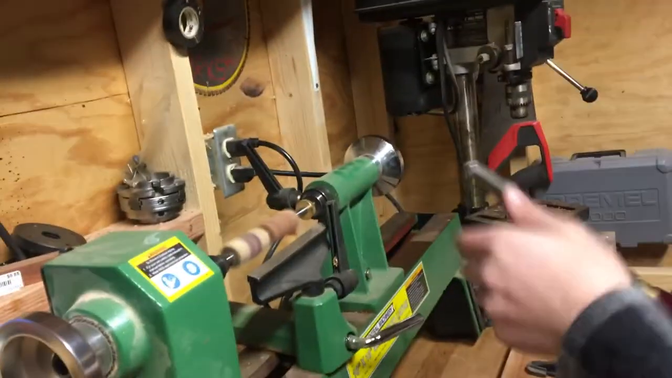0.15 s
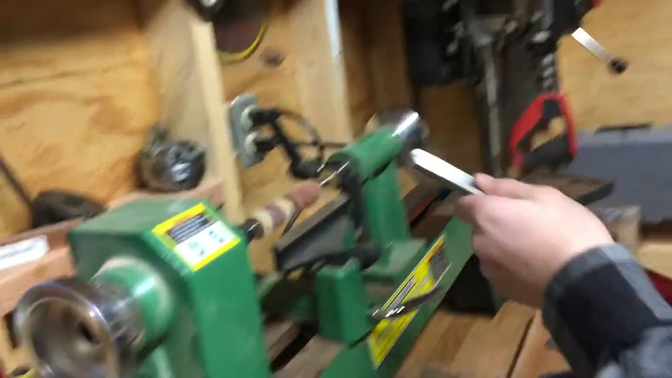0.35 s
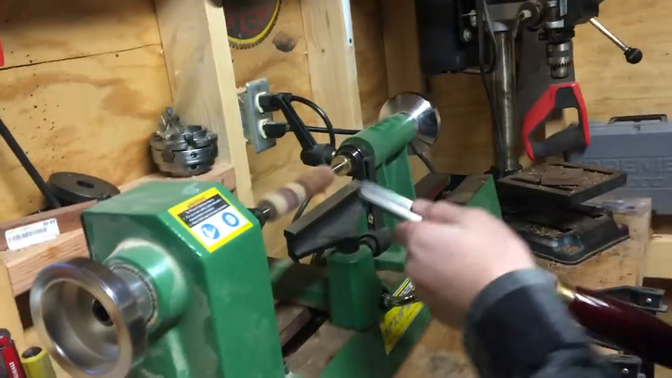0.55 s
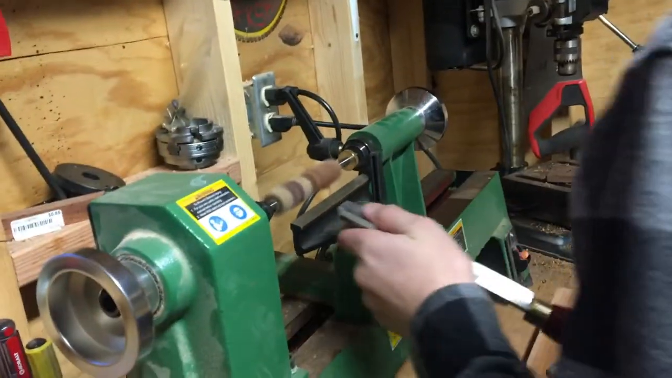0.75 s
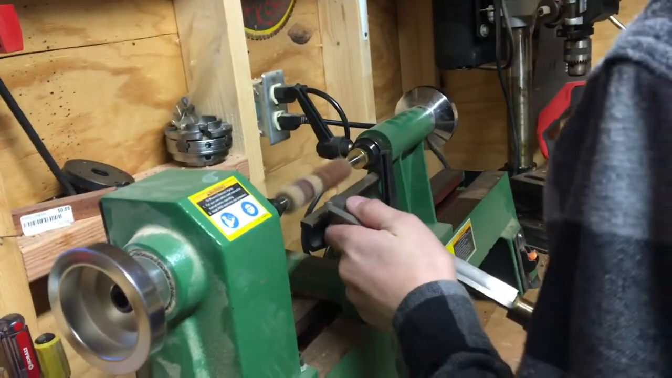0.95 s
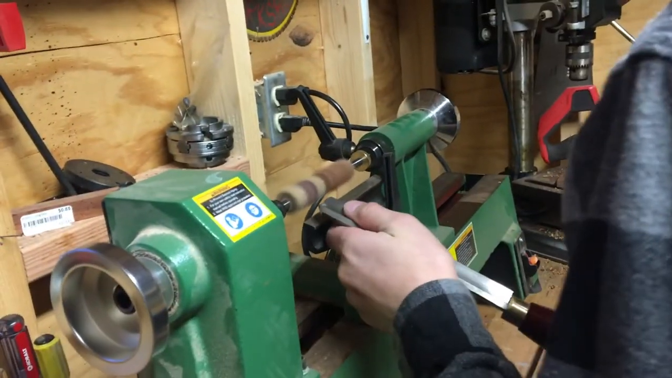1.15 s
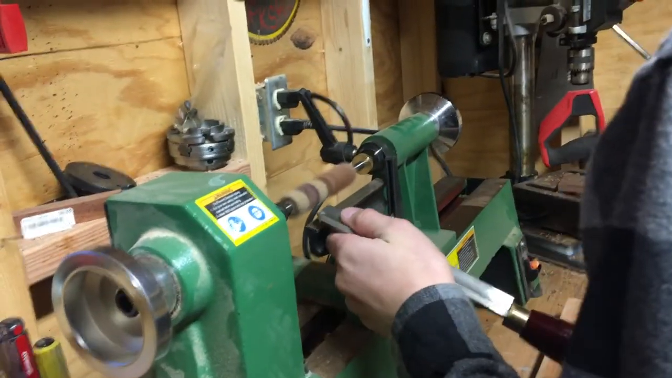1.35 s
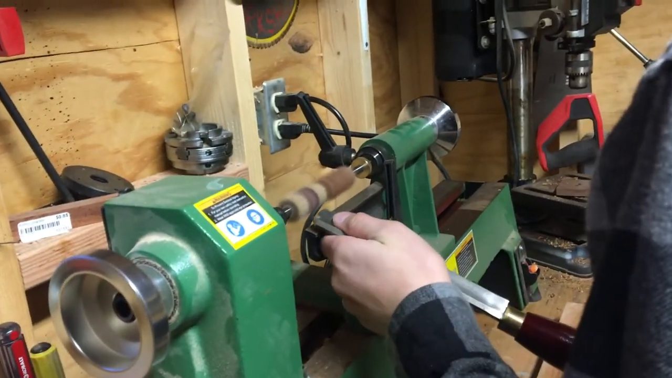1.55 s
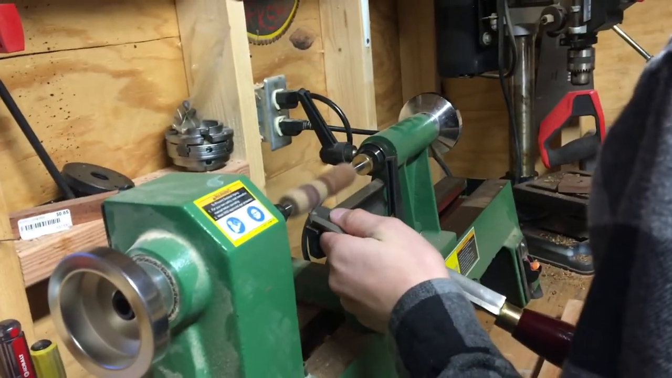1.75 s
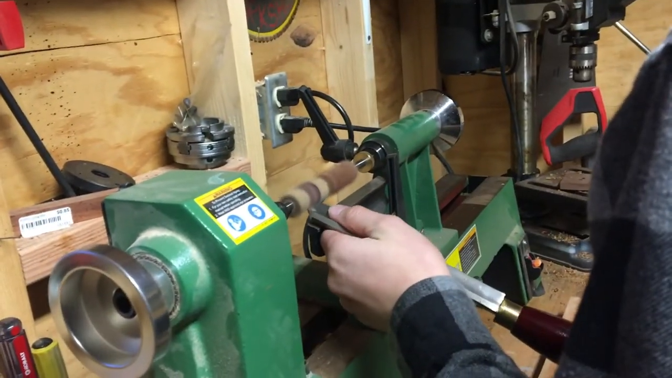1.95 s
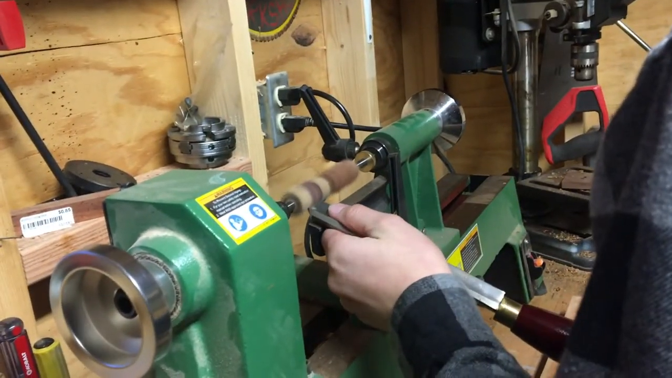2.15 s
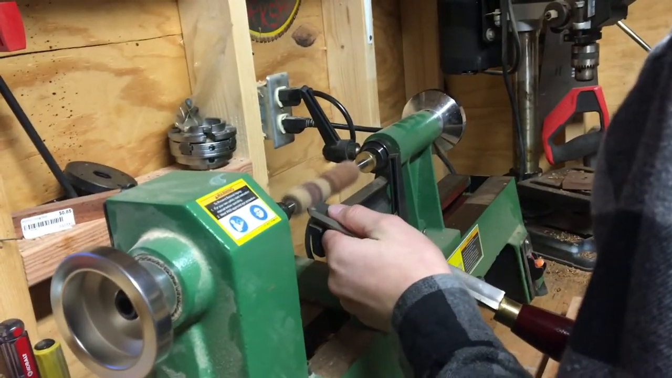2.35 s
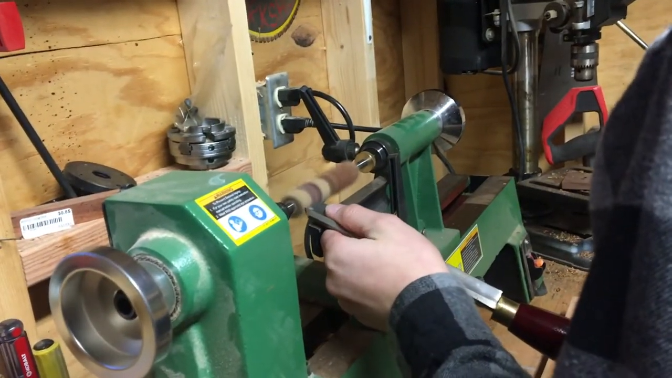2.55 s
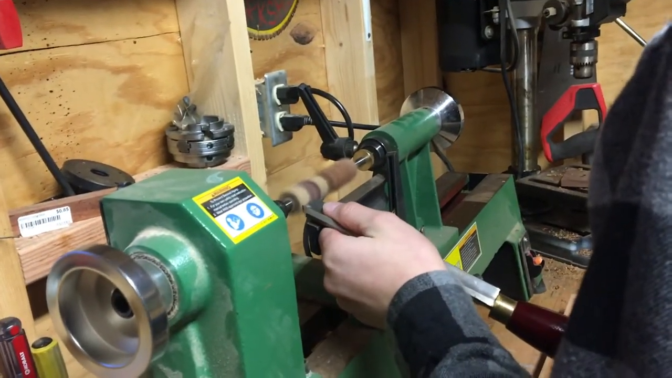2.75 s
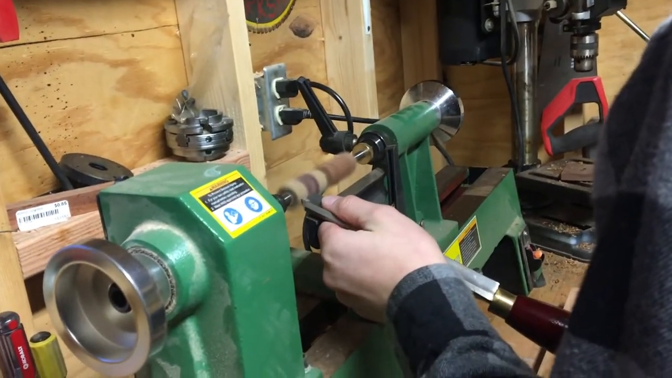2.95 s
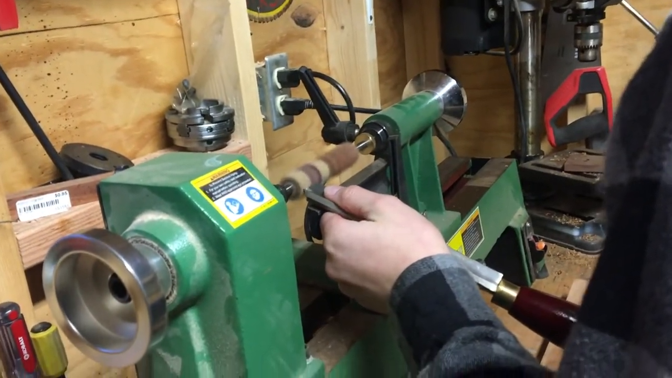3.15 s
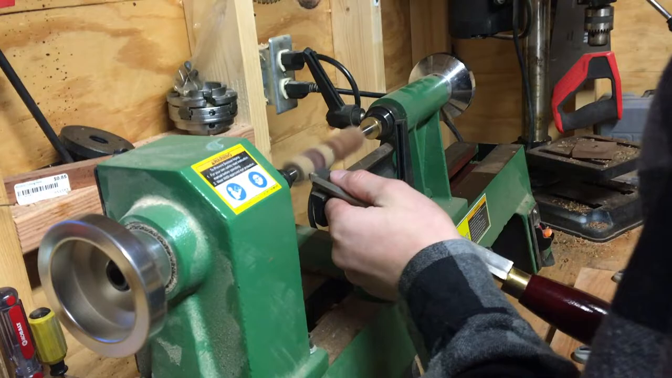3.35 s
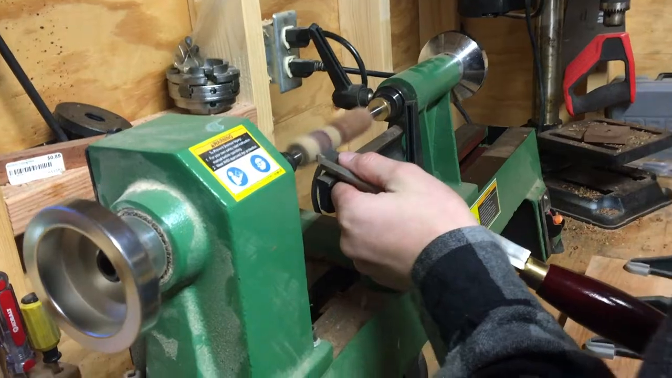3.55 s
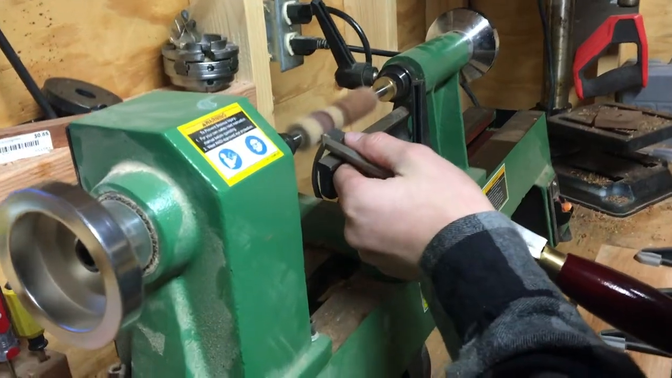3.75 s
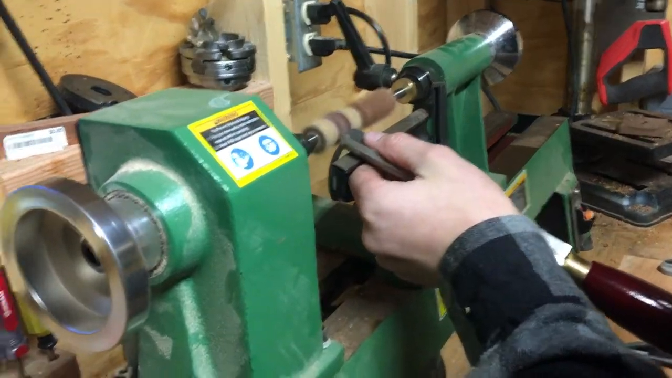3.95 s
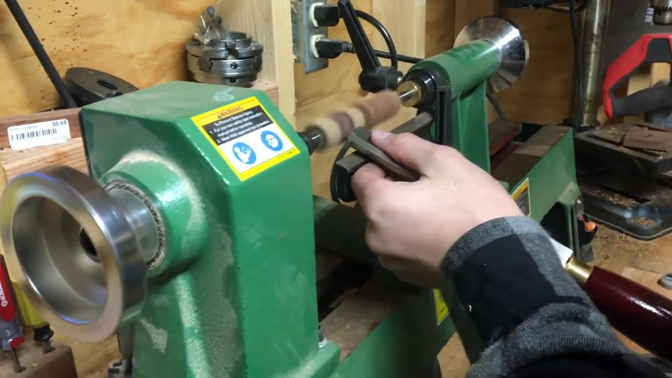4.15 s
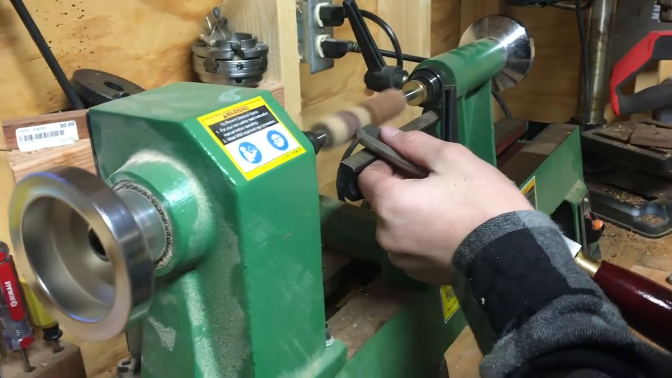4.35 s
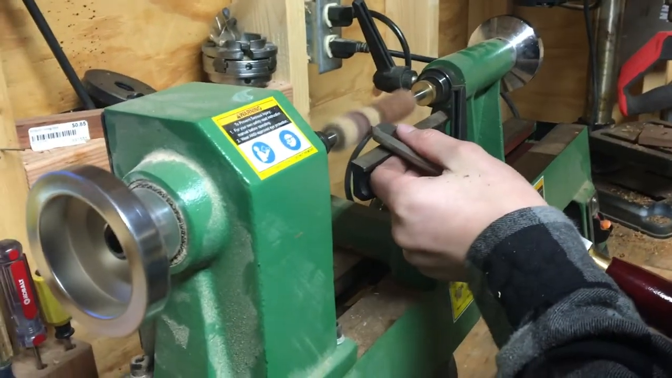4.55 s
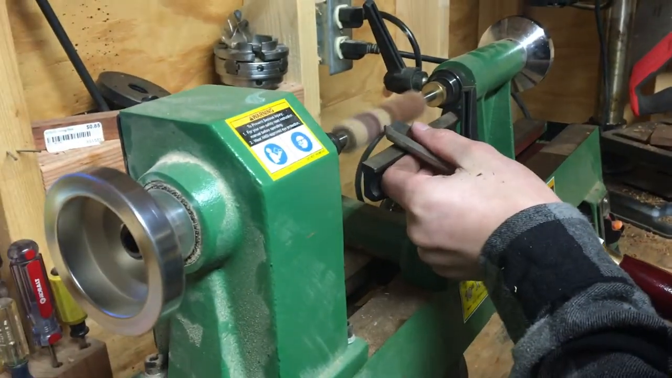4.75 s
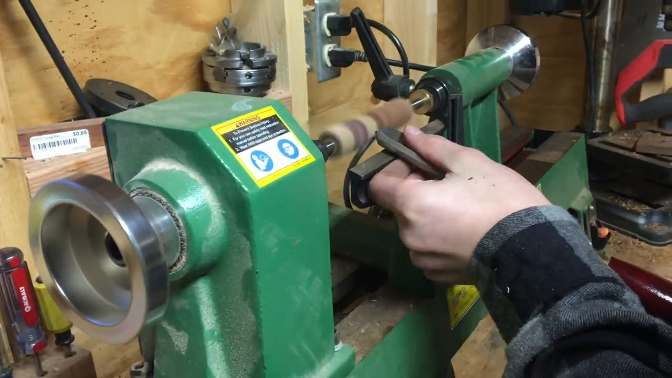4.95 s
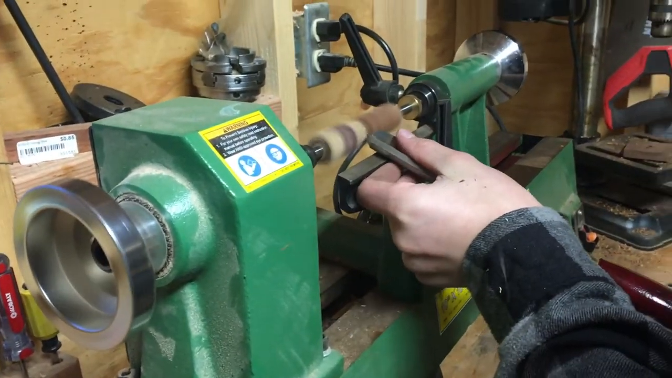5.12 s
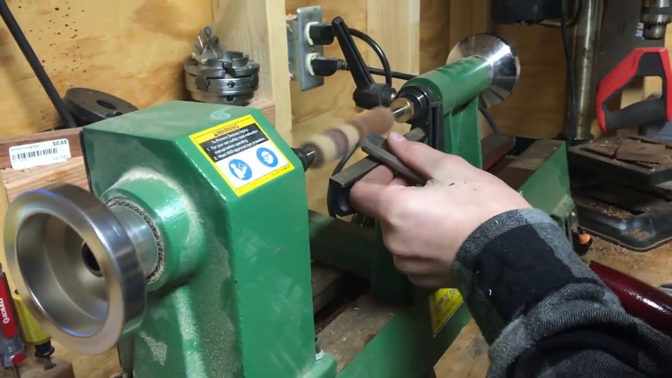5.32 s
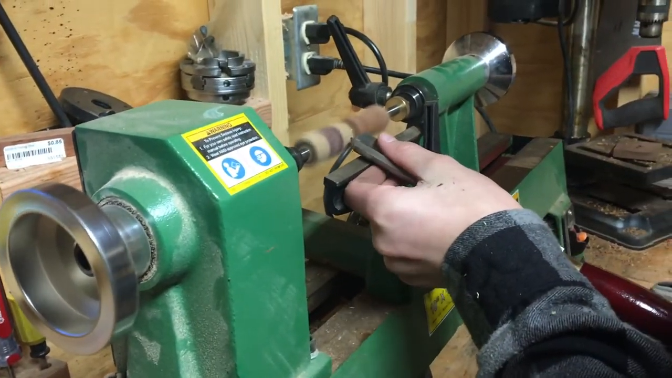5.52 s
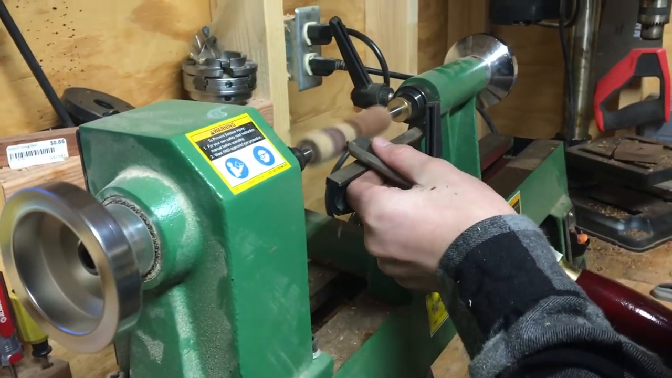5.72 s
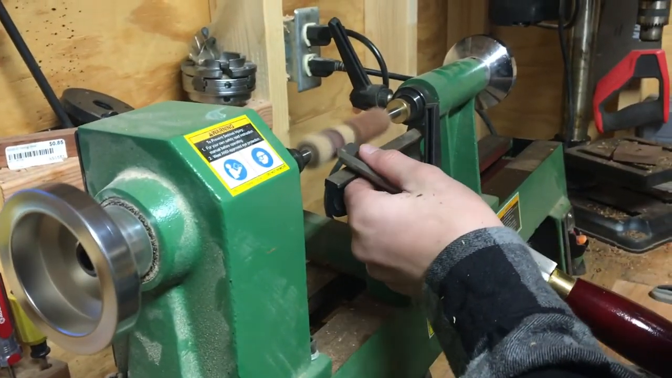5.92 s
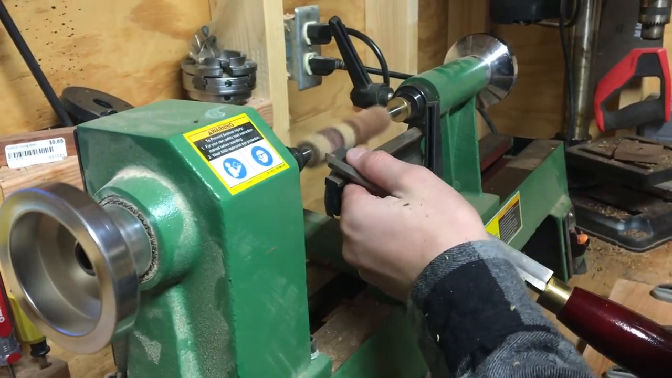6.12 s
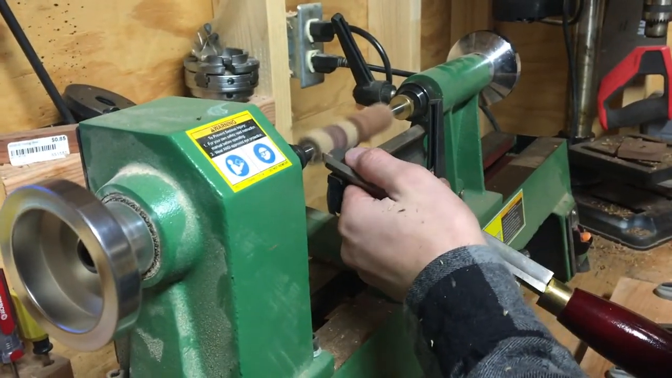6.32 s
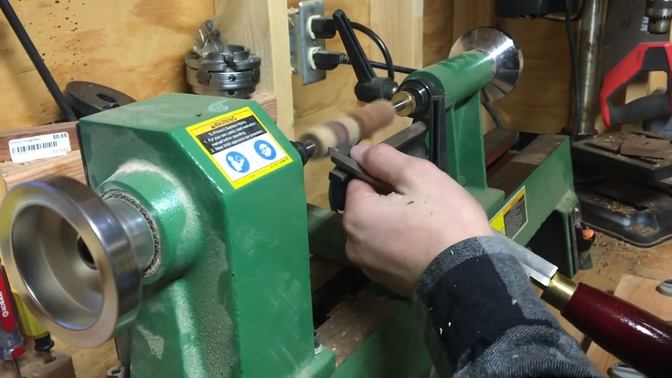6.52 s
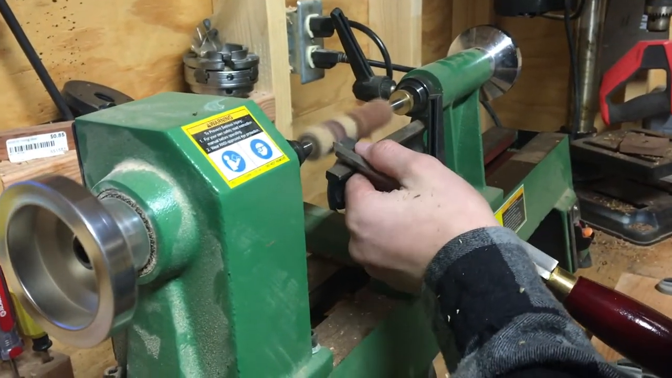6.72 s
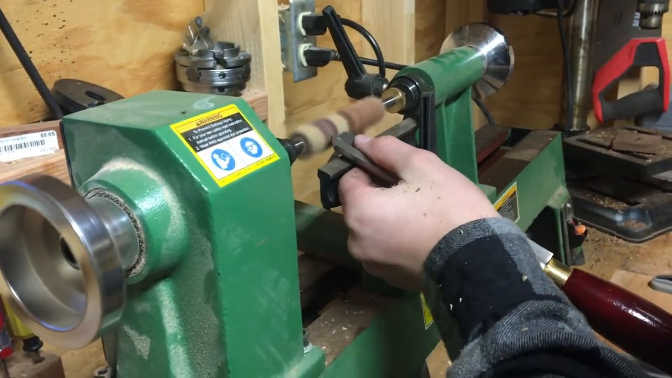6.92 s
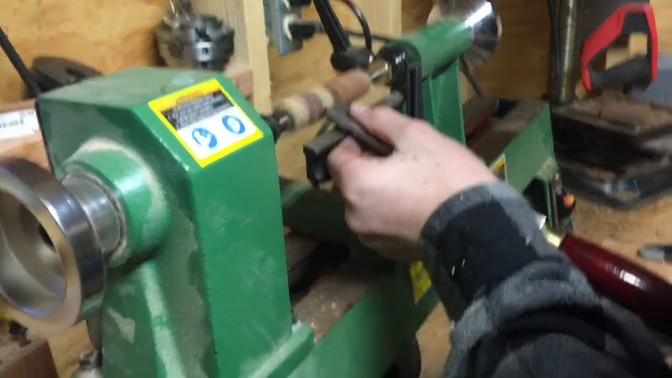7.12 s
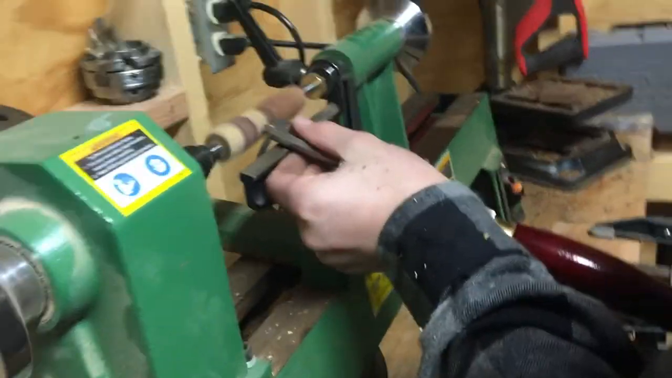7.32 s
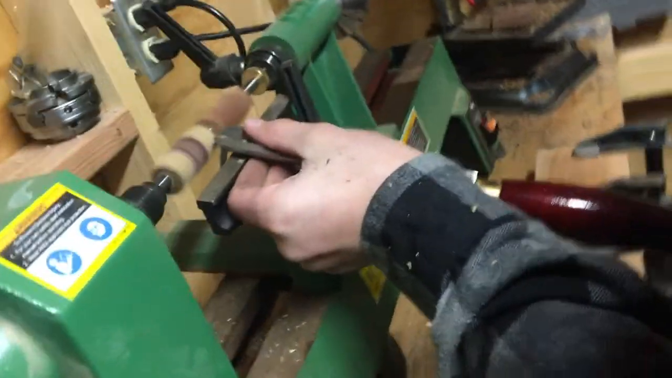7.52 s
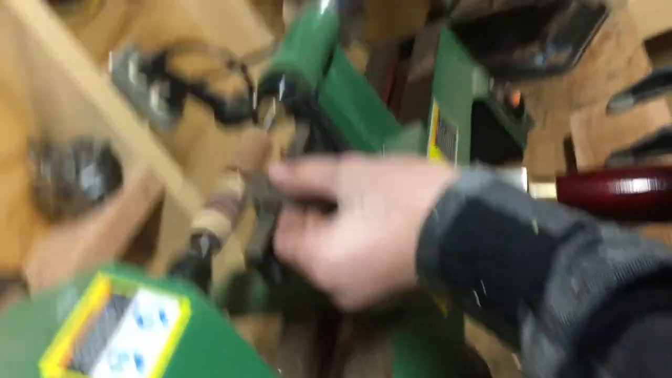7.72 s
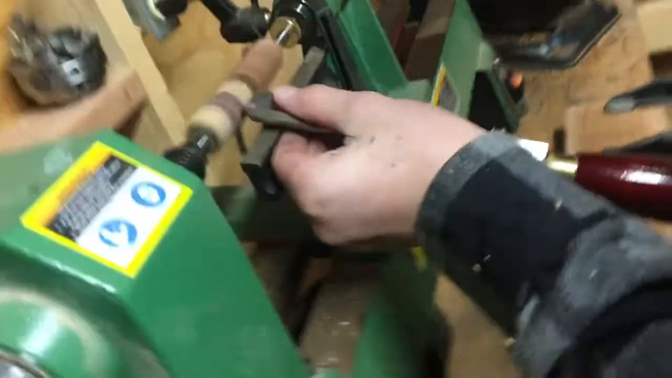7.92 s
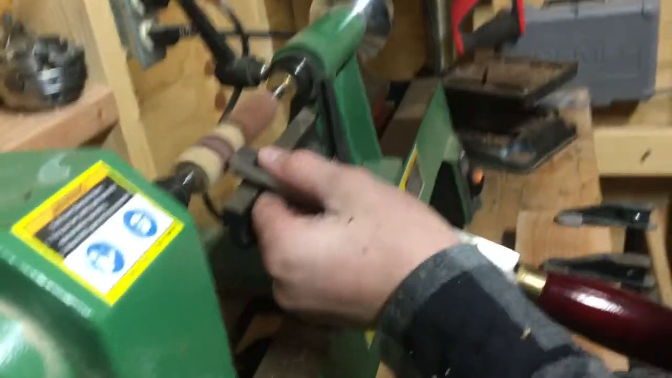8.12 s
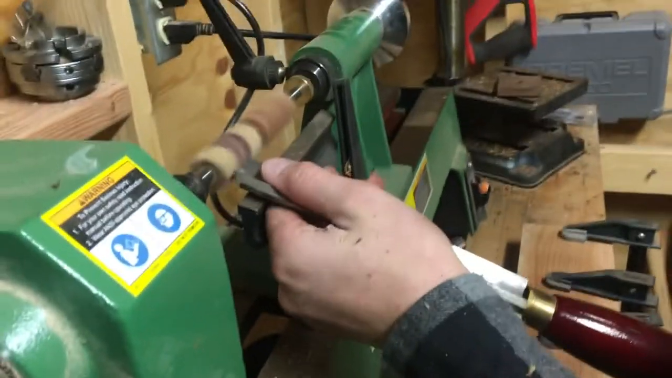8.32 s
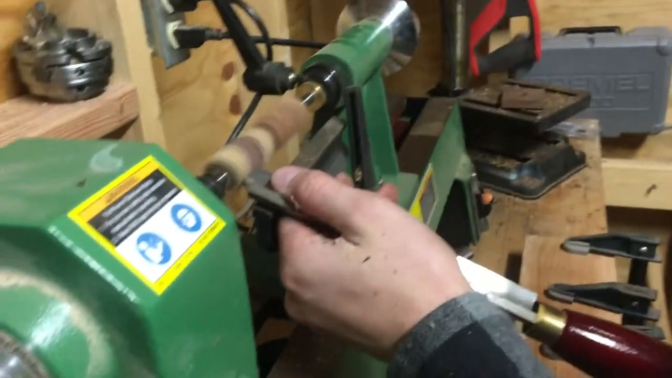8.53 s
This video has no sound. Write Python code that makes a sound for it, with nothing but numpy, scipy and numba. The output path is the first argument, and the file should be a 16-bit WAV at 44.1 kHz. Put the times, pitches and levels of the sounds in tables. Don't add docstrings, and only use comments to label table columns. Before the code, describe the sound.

A lathe motor hums evenly with dull thumps through the bench and one faint cloth brush. Crisp woody clicks follow as a tool touches spinning wood. Abruptly the whole sound jumps an octave higher and twice as fast, and a harsh, rapidly pulsing scrape takes over, hollow wood tone beneath, metallic hiss above, pressing and lifting unevenly. The close microphone slightly rounds loud peaks; the timber room adds only a short dull tail.

```python
import sys
import numpy as np
from scipy import signal
from scipy.fft import rfft, irfft
from scipy.io import wavfile
from scipy.ndimage import uniform_filter1d
from numba import njit

SR = 44100
rng = np.random.default_rng(int(sys.argv[2]) if len(sys.argv) > 2 else 0)


def waveform_to_disk(signal):
    frames = np.transpose(np.atleast_2d(signal))
    scaled = np.clip(frames, -1, 1) * 32767
    samples = np.round(scaled).astype(np.int16)
    wavfile.write(sys.argv[1], SR, samples)


def ratio(d):
    e = np.asarray(d, float) / 20
    return 10 ** e


N = 382788

FAST_S = 3.279
SPINDLE_HZ, MAINS_HZ, BELT_HZ = 28.135, 119.92, 151.02
CORNER_GAP_TURNS = .245

# multiple of the base rate, rms level in dB.
MAINS_LINES = [(1, -40), (2, -49.5)]
BELT_LINES = [(2, -69), (3, -60), (4, -63.5), (5, -53.5), (6, -51), (7, -63), (8, -59.5), (9, -60.5)]
SPINDLE_LINES = [(1, -61.5), (11, -68.5), (22, -66), (36, -79), (49, -60), (117, -62.5)]
# frequency in Hz, rms level in dB.
WHINES = [(205, -68), (270, -67), (352, -66), (410, -69), (713, -68), (738, -64), (812, -66), (880, -67),
          (1001, -65), (1039, -67), (1074, -63), (1096, -66), (1241, -66), (1123.9, -61), (1168.7, -65),
          (1264.1, -61), (1559.6, -73), (1661.2, -69), (1678.1, -62), (1829.1, -69), (1946.5, -70),
          (2030.9, -71), (2131.2, -70), (2248.5, -70), (2282.2, -71), (2360, -69), (2399.6, -71),
          (2468.2, -71), (2584, -71), (2632.8, -69), (4005.4, -78)]
# frequency in Hz, density in dB per Hz.
RUMBLE_SPECTRUM = [(18, -26), (30, -47), (64, -7.5), (88, -9.5), (124, 0), (149, -10.5), (179, -14),
                   (233, -8.5), (287, -20), (499, -15.5), (913, -14), (1460, -17.5), (3400, -24),
                   (4780, -34.5), (6000, -38), (6900, -38.5), (7900, -42.5), (9600, -38.5), (10400, -42.5),
                   (11700, -39), (13500, -43), (16000, -51)]
RUMBLE_DB = -46
# frequency in Hz, width in Hz, level in dB.
HOUSING_MODES = [(1100, 130, 6), (3340, 80, 6), (2130, 650, -4), (3550, 62, 5), (6200, 180, -37),
                 (3980, 20, 13)]
# start in seconds, peak in dB, frequency in Hz, length in seconds.
BENCH_KNOCKS = [(0.0, -41, 65, .08), (.515, -44, 310, .06), (.53, -33, 66, .12), (.56, -48, 340, .05),
                (.66, -47, 66, .12), (3.95, -47, 65, .08), (6.2, -48, 100, .1), (6.22, -46, 75, .14),
                (8.385, -38, 105, .06), (8.393, -38, 180, .05), (8.398, -38, 115, .05),
                (8.4, -39, 370, .03), (8.40, -37, 72, .08), (8.63, -47, 65, .1)]
# centre in seconds, level in dB, spread in seconds.
SLEEVE_BRUSH = (0.634, -61.5, 0.027)

# time in seconds, peak in dB.
FIRST_NICKS = [(2.6828, -36), (2.7187, -18.5), (2.7533, -20.5), (2.9672, -37), (3.0031, -22.5),
               (3.0739, -32), (3.1093, -34.5), (3.144, -30), (3.1813, -36), (3.2161, -22), (3.2513, -26.5),
               (3.2837, -24.5)]
FAST_NICKS = [(3.3897, -26), (3.4074, -18.5), (3.4425, -25), (3.5315, -21), (3.549, -17), (3.5854, -18),
              (3.6557, -30), (3.675, -26.5), (3.7095, -35), (3.727, -19), (3.7624, -33), (3.7804, -23.5),
              (3.7983, -40), (3.8512, -48), (3.8698, -22), (3.8874, -24)]
# frequency in Hz, density in dB per Hz.
NICK_SPECTRUM = [(180, -38), (300, -5), (930, -3.5), (2100, -8.5), (3290, -12), (5610, -15.5), (6300, -11),
                 (7690, -22.5), (11500, -22.5), (16000, -35)]
# frequency in Hz, width in Hz, level in dB.
GOUGE_MODES = [(2630, 6, -2), (3210, 49, -2), (3590, 440, -5), (5200, 95, -15), (6100, 46, -22),
               (8650, 130, 1), (11200, 96, -4)]

# time in seconds, pressure in dB, edge shear in dB,
# coupling to the headstock in dB.
FEED_PATH = [(3.28, -41.5, -6, -12), (3.7, -39.5, 2.5, -7), (4.0, -42, 0.5, -4.5), (4.45, -42.5, 4, 0.5),
             (4.7, -36.5, -2, -10.5), (5.0, -32, -11.5, -18), (5.45, -34.5, -8.5, 0), (5.8, -39, 0.5, -4.5),
             (5.95, -39.5, 2, -6), (6.19, -38, 3, -12), (6.27, -39, -2, -33), (6.9, -43, 5.5, -37),
             (7.25, -36.5, -4.5, -10), (7.75, -36.5, -8, -9), (8.05, -41.5, 3.5, -12),
             (8.15, -46.5, 10.5, -1), (8.45, -38, 10, -14), (8.68, -40.5, 7, -28)]
# time in seconds, hold in seconds, force in dB, extra tear in dB.
HAND_DIGS = [(3.4, 0.077, -2, 7.5), (3.52, 0.071, 1.5, 5), (3.77, 0.033, 1.5, 2), (3.86, 0.041, 5.5, 0.5),
             (3.99, 0.063, 3.5, 0), (4.11, 0.054, 2, 6.5), (4.35, 0.066, 1.5, -2), (4.5, 0.046, 7, -2.5),
             (4.92, 0.084, -0.5, 3.5), (5.07, 0.045, 4, 5), (5.16, .19, 2, 4.5), (5.413, 0.019, 10.5, 1.5),
             (5.63, 0.033, -2, 5), (5.855, 0.0081, 1.5, 4), (5.93, 0.026, 2.5, 1), (6.09, 0.1, 2.5, 0),
             (6.33, 0.019, 2.5, 3.5), (6.5, 0.012, 6.5, -3.5), (6.68, 0.05, 4.5, -4),
             (7.13, 0.027, -3, 5.5), (7.79, 0.072, 4, 5), (8.2, 0.028, -1.5, 0), (8.345, 0.042, 6.5, -3.5),
             (8.615, 0.0084, 5.5, -6)]
DIG_RISE_S, DIG_FALL_S = 0.026, 0.062
# deepest moment in seconds, depth in dB, easing in seconds, return in seconds.
HAND_LIFTS = [(3.35, 22, 0.13, 0.076), (3.49, 6, 0.035, 0.05), (3.632, 7, 0.05, .05),
              (3.96, 1, 0.036, 0.032), (4.47, 1.5, 0.043, 0.026), (4.63, 8.5, 0.016, 0.022),
              (5.04, 7, 0.052, 0.068), (5.28, 22, 0.21, 0.35), (5.6, 7, 0.045, 0.051),
              (5.79, 4, 0.083, 0.01), (6.29, 7, 0.019, 0.025), (6.45, 8.5, 0.13, 0.05),
              (6.63, 1, 0.034, 0.027), (6.999, 8.5, 0.049, 0.016), (7.09, 1.5, 0.027, .03),
              (7.22, 5, 0.033, 0.11), (7.6, 8.5, .1, 0.057), (7.99, 1.5, 0.039, 0.087),
              (8.31, 9, 0.02, 0.024)]
# offset in dB, share of pressure, share of digs, share of lifts.
BLANK_FOLLOWS = (-41.5, -0.05, 0.38, 0.86)
HEAD_FOLLOWS = (-34, 2.7, 1.13, 1.5)
TEAR_FOLLOWS = (-37.5, 1.37, 1.29, 1.17)
BED_FOLLOWS = (-52, 0, 0.55, 1)
MEAN_PRESSURE_DB = -38
# time in seconds, level in dB, spread in seconds.
BED_JOLTS = [(3.28, -65, 0.03), (3.87, -67, 0.28), (4.85, -59.5, 0.13), (7.37, -47.5, 0.038),
             (7.87, -53, 0.13), (8.41, -56, 0.045), (8.68, -50, 0.057)]
BED_GROWTH_DB_S, BED_SECOND_DB = 1, -17
RUN_OUT_S, RUN_OUT_DB_S = 8.44, -67

# time in seconds, angle of the first corner in turns,
# second corner minus first in dB, length of a bite in turns.
CORNER_PATH = [(3.28, 1, -34, 0.08), (3.88, 1.05, -29, 0.25), (3.931, .81, -1, 0.18),
               (5.202, .80, 2.5, 0.13), (5.6, 0.83, 2, 0.26), (6.146, 0.73, -2.5, 0.2),
               (6.223, 0.99, -1.5, 0.24), (6.999, .90, 2.5, 0.17), (7.501, 0.89, -3, 0.29),
               (8.202, 0.83, 5.5, 0.086), (8.68, 0.94, -7, 0.086)]
CRACK_TURNS, CRACK_DB = 0.067, -11
# time in seconds, heard pitch in Hz, level in dB.
BLANK_RING = [(3.28, 804, -1.5), (3.9, 830, -1.5), (4.1, 755, -2), (4.35, 794, 0), (4.55, 830, 2),
              (5.2, 832, 3), (5.45, 830, 6), (5.75, 849, 1.5), (5.92, 785, -2), (6.2, 764, 1.5),
              (6.5, 785, -1), (7.1, 778, 2), (7.28, 818, 1), (7.6, 825, 2.5), (7.92, 804, 4.5),
              (8.1, 774, -1), (8.3, 747, 0), (8.68, 750, 7)]
SIDE_MODE_S, SIDE_MODE_SPAN_S = 6.05, 0.55
HEADSTOCK_HZ = 450.
STRIKE_DB, STRIKE_LAG_TURNS, STRIKE_TURNS, STRIKE_HZ = -2, .08, .004, 900.
GRIP_TIMES = [3.28, 3.9, 4.46, 5.18, 5.4, 5.85, 6.24, 7.2, 8.1, 8.33, 8.68]
REGRIP_S = 0.13
# heard frequency in Hz, level in dB.
SHAFT_RINGS = [
    [(1575, 7), (1856, 5), (3250, 11), (3712, 11), (4725, -6), (5203, 1)],
    [(1518, 4), (1828, 3), (3375, 8), (3712, 9), (4584, 1), (5259, -7)],
    [(1603, -15.5), (1856, -8), (3318, 3), (3712, -2), (4556, 1), (5034, 3)],
    [(1518, -12), (1828, -2), (2165, 8), (3712, -4), (4430, 6), (5850, 26)],
    [(2220, 2), (1850, 0), (3250, -6), (3712, 1), (4560, 14), (5100, 5)],
    [(1575, 1.5), (1828, -10), (3300, 4), (3712, 8), (4500, 1), (5203, -3)],
    [(1505, 1.5), (1856, -8), (2165, -1), (3080, 7.5), (3825, 0), (4650, 3)],
    [(1804, 2), (2290, 0.5), (1520, 0), (3730, 4.5), (4400, 5), (5200, -6)],
    [(1659, 5.5), (2306, -5), (3262, 11), (4415, 7), (4668, -2), (5343, 13)],
    [(1603, 1.5), (2306, 9.5), (3121, 8), (4668, -14), (5118, 16), (5371, 9)],
]
EDGE_RINGS = [
    [(6862, 9), (7440, 3), (10350, -4), (12121, -13)],
    [(6637, -12), (7396, 5), (10434, 8), (12065, -9)],
    [(6946, -1), (8043, 1), (9200, -7), (12093, 3)],
    [(6581, 17.5), (9281, -4), (10462, 13), (12543, 14)],
    [(6665, 1.2), (7453, -2.2), (8634, -2.2), (12206, 2.5)],
    [(6693, 3.5), (8000, 10), (8500, 4), (12121, -7)],
    [(6609, -0.79), (7565, -1), (8200, -1.6), (12250, -0.41)],
    [(6500, -11), (8550, -16), (9200, -22), (12165, 9)],
    [(6637, 5), (8100, -9), (9100, -8), (12262, 5)],
    [(6609, 3), (8100, -28), (9000, 5.5), (12150, 5)],
]
SHAFT_CYCLES, EDGE_CYCLES = 20, 28
# frequency in Hz, density in dB per Hz.
SCRAPE_SPECTRUM = [(590, -48), (1000, -4.5), (1240, -10.5), (1460, -0.5), (1860, -0.5), (2600, -7),
                   (3740, 0.5), (5500, -8), (7150, -22), (12100, -120)]
TEAR_SPECTRUM = [(2350, 1.5), (4000, -1), (4210, -3), (4560, -1.5), (5600, -2.5), (6720, 2), (7230, -2),
                 (8880, -1), (9840, -7.5), (11000, -9), (12400, -6), (15600, -16)]

SHED_T60_S, SHED_DB = 0.15, -12
SHED_DULL_HZ = 4300
ROUND_AT = .3


def level(x, db=0):
    return x * ratio(db) / np.sqrt(np.mean(x ** 2))


def as_loud(x, gain):
    return level(x) * np.sqrt(np.mean(gain ** 2))


def shed_time(s):
    return s + np.maximum(np.asarray(s) - FAST_S, 0)


def along(t, when, values):
    return np.interp(t, shed_time(when), values)


def highpass(x, hz):
    return signal.sosfilt(signal.butter(4, hz, "high", fs=SR, output="sos"), x)


def colour(x, points, pace=1):
    hz, db = np.transpose(points)
    grid = np.maximum(np.arange(1025) * SR / 2048, 1)
    log_gain = np.interp(np.log(grid), np.log(hz / pace), db) * np.log(10) / 20
    cepstrum = irfft(log_gain)
    cepstrum[1:1024] *= 2
    cepstrum[1025:] = 0
    response = irfft(np.exp(rfft(cepstrum)))
    return signal.oaconvolve(x, response)[:len(x)]


@njit
def svf(x, hz, width):
    y, band, low = np.empty(len(x)), 0., 0.
    for i in range(len(x)):
        g, k = np.tan(np.pi * hz[i] / SR), width / hz[i]
        v = (band + g * (x[i] - low)) / (1 + g * (g + k))
        band, low, y[i] = 2 * v - band, low + 2 * g * v, k * v
    return y


def ring(x, modes, pace=1):
    return sum(ratio(db) * svf(x, np.full(len(x), hz / pace), width / pace) for hz, width, db in modes)


def per_turn(turns, keep, rough_db=0):
    keep, size = np.clip(keep, 0, .995), int(SR / SPINDLE_HZ)
    fresh = rng.standard_normal((int(turns[-1]) + 41, size))
    fresh *= ratio(rough_db * rng.exponential(size=fresh.shape))
    surface = signal.lfilter([1], [1, -keep], fresh, axis=0)[40:]
    return level(surface.ravel()[(turns * size).astype(int)])


def shed(x):
    age = np.arange(int(.6 * SR)) / SR
    tail = rng.standard_normal(len(age)) * np.exp(-np.log(1000) * age / SHED_T60_S) * (age > .004)
    tail = signal.sosfilt(signal.butter(1, SHED_DULL_HZ, fs=SR, output="sos"), tail)
    return x + ratio(SHED_DB) * signal.oaconvolve(x, tail / np.sqrt(np.sum(tail ** 2)))[:len(x)]


def motor(t):
    lines = list(WHINES)
    for base_hz, orders in ((MAINS_HZ, MAINS_LINES), (BELT_HZ, BELT_LINES), (SPINDLE_HZ, SPINDLE_LINES)):
        lines += [(base_hz * int(k + .5), db) for k, db in orders]
    hum = sum(ratio(db) * np.sqrt(2) * np.sin(2 * np.pi * (hz * t + rng.random())) for hz, db in lines)
    rumble = rng.standard_normal(len(t)) + ratio(-6.5) * per_turn(t * SPINDLE_HZ, keep=1.0)
    return hum + level(colour(rumble + ring(rumble, HOUSING_MODES), RUMBLE_SPECTRUM), RUMBLE_DB)


def bench(t):
    out = np.zeros(len(t))
    for s, db, hz, length in BENCH_KNOCKS:
        age = np.clip(t - shed_time(s), 0, length)
        out += ratio(db) * np.sin(2 * np.pi * hz * age) * np.sin(np.pi * np.sqrt(age / length))
    return out


def sleeve(t):
    s, db, spread = SLEEVE_BRUSH
    cloth = level(svf(rng.standard_normal(len(t)), 0 * t + 7400.0, 6000.))
    return ratio(db) * np.exp(-((t - s) / spread) ** 2) * cloth


def hand():
    s = np.arange(FAST_S, N / SR, .004)
    ring_s, ring_hz, ring_db = np.transpose(BLANK_RING)
    feed_s, *feed = np.transpose(FEED_PATH)
    pressure, shear, coupling = (np.interp(s, feed_s, column) for column in feed)
    dig, rip, lift = 0, 0, 0
    for at, hold, force_db, tear_db in HAND_DIGS:
        shape = np.clip(np.minimum((s - at) / DIG_RISE_S + .5, 1 - (s - at - hold) / DIG_FALL_S), 0, 1)
        dig = dig + force_db * shape
        rip = rip + tear_db * shape
    for at, depth_db, ease, back in HAND_LIFTS:
        lift = lift + depth_db * np.clip(np.minimum(1 + (s - at) / ease, 1 - (s - at) / back), 0, 1)

    def follow(law):
        offset, by_pressure, by_dig, by_lift = law
        return offset + by_pressure * (pressure - MEAN_PRESSURE_DB) + by_dig * dig - by_lift * lift

    run_out = RUN_OUT_DB_S * np.maximum(s - RUN_OUT_S, 0)
    return {"s": s,
            "blank_db": follow(BLANK_FOLLOWS) + np.interp(s, ring_s, ring_db) + run_out,
            "blank_hz": np.interp(s, ring_s, ring_hz),
            "steel_db": pressure + dig - lift,
            "tear_db": follow(TEAR_FOLLOWS) + shear + rip,
            "head_db": follow(HEAD_FOLLOWS) + coupling,
            "shake_db": follow(BED_FOLLOWS) + BED_GROWTH_DB_S * (s - 6)}


def bed(t, moves):
    s, shake_db = moves["s"], moves["shake_db"]
    double = ratio(shake_db + BED_SECOND_DB)
    double = double + sum(ratio(db) * np.exp(-((s - at) / spread) ** 2) for at, db, spread in BED_JOLTS)
    shake = 0
    for k, gain in ((3, ratio(shake_db)), (2, double)):
        shake = shake + along(t, s, gain) * np.sqrt(2) * np.sin(2 * np.pi * k * SPINDLE_HZ * t)
    return (t > FAST_S) * shake


def nicks(t):
    gate = np.zeros(len(t))
    for s, db in list(FIRST_NICKS) + list(FAST_NICKS):
        for lag_s, lag_db in ((0, -4), (.0045, -7)):
            at = int((shed_time(s) + lag_s) * SR)
            age = np.arange(min(2000, len(t) - at)) / SR
            gate[at:at + len(age)] += ratio(db + lag_db) * (1 - np.exp(-age / 0.00082)) * np.exp(-age / 0.0053)
    burst = gate * level(colour(rng.standard_normal(len(t)), NICK_SPECTRUM))
    return ratio(-2.05) * burst + ratio(8.5) * ring(burst, GOUGE_MODES)


def blank_ring(t, turns, shove, moves):
    hz = uniform_filter1d(along(t, moves["s"], moves["blank_hz"]) / 2, size=4000)
    free = svf(svf(shove, hz, 43.0), hz, 180.0)
    fixed = ratio(-6.5) * ring(shove, [(194.8, 2.85, -3.5), (336.7, 21, -4.0)])
    awake = .15 + np.exp(-((t - shed_time(SIDE_MODE_S)) / SIDE_MODE_SPAN_S) ** 2)
    return free + fixed + awake * ring(shove, [(312.8, 2.0, 4.5)])


def headstock_ring(shove):
    main = ring(ring(shove, [(HEADSTOCK_HZ, 16, 0)]), [(HEADSTOCK_HZ, 60, 0)])
    return main + ring(shove, [(531, 32, -12.5), (478, 6.7, -11.5)])


def held(x, t, holds, ring_db, cycles):
    out = 1. * x
    edges = shed_time(GRIP_TIMES)
    for start, stop, modes in zip(edges, edges[1:], holds):
        a, b = np.searchsorted(t, [start - REGRIP_S, stop + 2 * REGRIP_S])
        share = np.clip(np.minimum(t[a:b] - start, stop - t[a:b]) / REGRIP_S / 2 + .5, 0, 1)
        rings = [(hz, hz / cycles, db) for hz, db in modes]
        out[a:b] += ratio(ring_db) * ring(x[a:b] * share, rings, pace=2)
    return out


def steel_shaft(t, turns, gate, angle, size, gain):
    slow_gate = uniform_filter1d(gate, size=210, origin=104)
    grain = per_turn(turns, keep=0.75, rough_db=0.5) + ratio(-6.5) * rng.standard_normal(len(t))
    strike = np.sum(size * np.exp(-((angle - STRIKE_LAG_TURNS) % 1) / STRIKE_TURNS), axis=0)
    knock = level(ring(strike, [(STRIKE_HZ, STRIKE_HZ, 0)]), STRIKE_DB)
    force = level((slow_gate + 0.026 * gate) * grain) + knock
    scrape = colour(gain * force, SCRAPE_SPECTRUM, pace=2.1)
    steel = highpass(held(scrape, t, SHAFT_RINGS, ring_db=4.5, cycles=SHAFT_CYCLES), 280)
    return as_loud(steel, gain)


def torn_fibres(t, turns, since, gate, angle, size, gain):
    crack = ratio(CRACK_DB) * np.sum(size * np.exp(-angle / CRACK_TURNS), axis=0)
    chatter = 1 + .4 * np.cos(2 * np.pi * 16 * since)
    fibre = (gate + crack) * chatter * per_turn(turns, keep=0.18, rough_db=2.0)
    tear = colour(gain * fibre, TEAR_SPECTRUM, pace=2.003)
    tear = highpass(held(tear, t, EDGE_RINGS, ring_db=-4.0, cycles=EDGE_CYCLES), 1500)
    return as_loud(tear, gain)


def cut(t, moves):
    s = moves["s"]
    when, first, second_db, bite = np.transpose(CORNER_PATH)
    turns = t * SPINDLE_HZ
    since = turns - shed_time(3.3) * SPINDLE_HZ - along(t, when, first)
    one_pass = np.floor(since - np.floor(since[0])).astype(int)
    depth = np.clip(rng.standard_normal((int(turns[-1]) + 9, 2))[one_pass].T, -1.7, 1.7)
    angle = np.array([since % 1, (since - CORNER_GAP_TURNS) % 1])
    size = np.array([1 + 0 * t, ratio(along(t, when, second_db))])
    size = size * ratio(.4 * depth[0] + .7 * depth)
    gate = np.sum(size * (1 - np.exp(-angle / 0.00031)) * np.exp(-angle / along(t, when, bite)), axis=0)

    shove = sum(np.cos(2 * np.pi * k * turns - .3 * (k - 15) ** 2 - 3.4 * k) for k in range(7, 26))
    uneven = svf(gate * per_turn(turns, keep=.9), 0 * t + 450., 400.)
    shove = level(shove) + ratio(-7) * level(uneven)
    blank_db = along(t, s, moves["blank_db"]) + 2.5 * uniform_filter1d(depth[0], size=1500)
    body = ratio(blank_db) * level(blank_ring(t, turns, shove, moves))
    body = body + ratio(along(t, s, moves["head_db"])) * level(headstock_ring(shove))

    landed = t - (angle[0] - .2) / SPINDLE_HZ
    steel_gain = ratio(along(landed, s, moves["steel_db"])) * (landed > FAST_S)
    tear_gain = ratio(along(landed, s, moves["tear_db"])) * (landed > FAST_S)
    scrape = steel_shaft(t, turns, gate, angle, size, steel_gain)
    scrape = scrape + torn_fibres(t, turns, since, gate, angle, size, tear_gain)
    return (t > FAST_S) * body, scrape


def scene():
    t = np.arange(2 * N) / SR
    t = t[t <= shed_time(N / SR)]
    moves = hand()
    body, scrape = cut(t, moves)
    background = motor(t) + bench(t) + sleeve(t)
    sound = background + bed(t, moves) + body + shed(nicks(t) + scrape)
    half = int(FAST_S * SR / 2)
    fast = signal.resample_poly(sound, 1, 2)[half:]
    return np.concatenate([sound[:2 * half], fast, np.zeros(9)])[None, :N]


def top_cut(x):
    return signal.sosfilt(signal.butter(12, 16530, fs=SR, output="sos"), x)


def record(dry):
    rounded = ROUND_AT * np.tanh(dry / ROUND_AT)
    top = signal.ellip(8, .3, 48, 15800, fs=SR, output="sos")
    return top_cut(signal.sosfilt(top, rounded))


dry = scene()
out = record(dry)
waveform_to_disk(out)
```